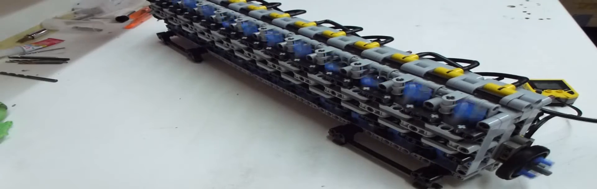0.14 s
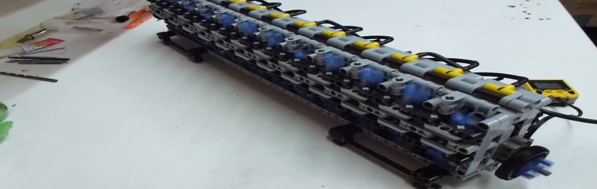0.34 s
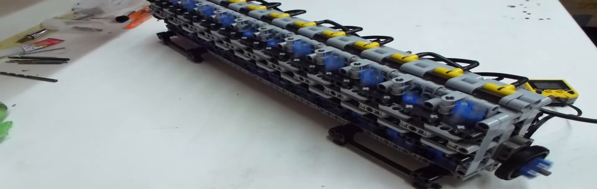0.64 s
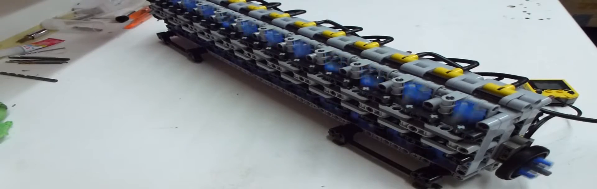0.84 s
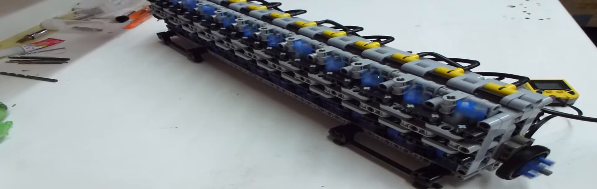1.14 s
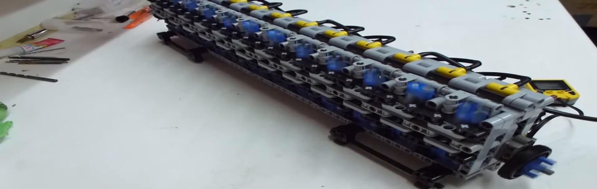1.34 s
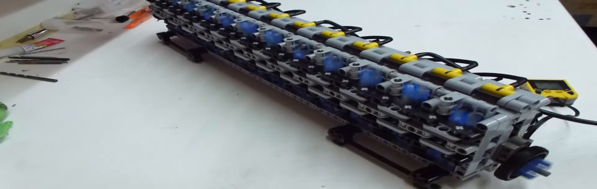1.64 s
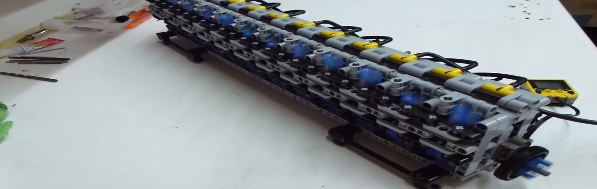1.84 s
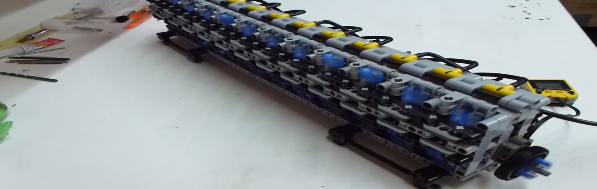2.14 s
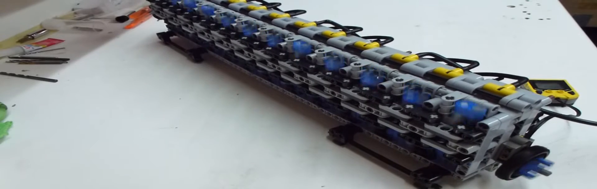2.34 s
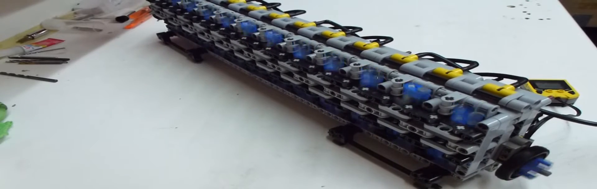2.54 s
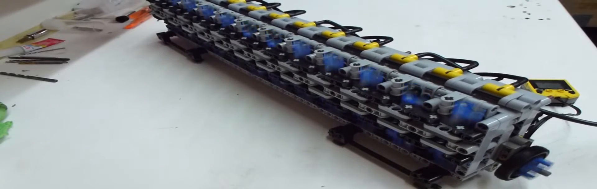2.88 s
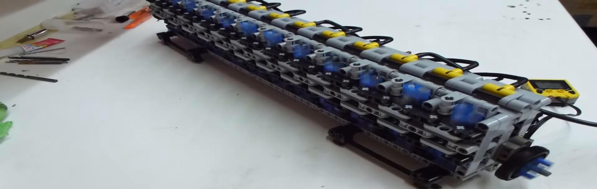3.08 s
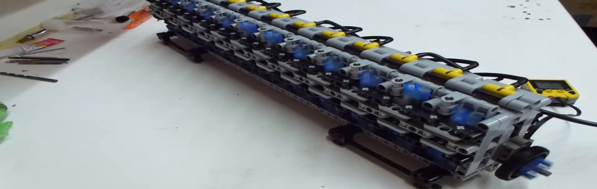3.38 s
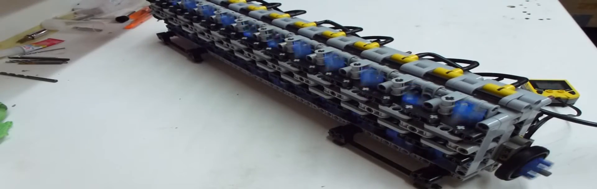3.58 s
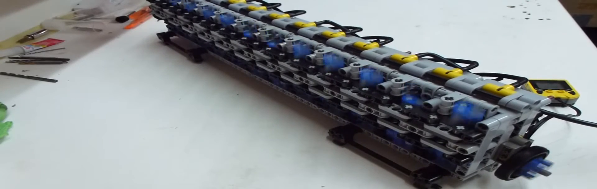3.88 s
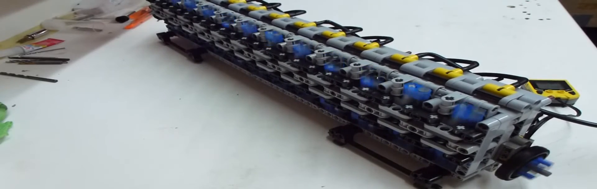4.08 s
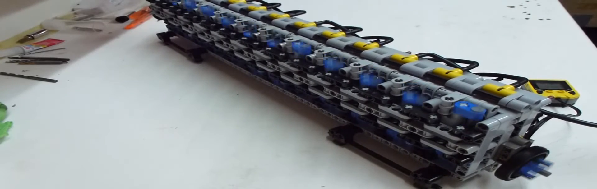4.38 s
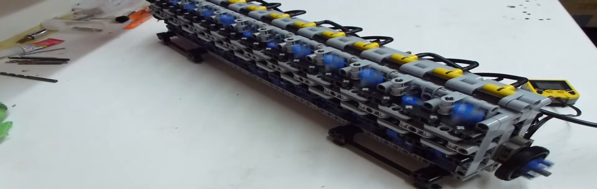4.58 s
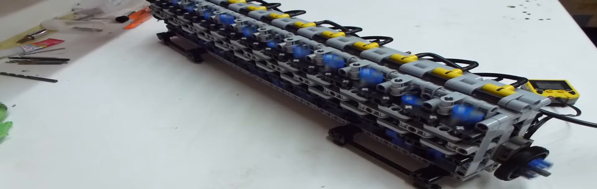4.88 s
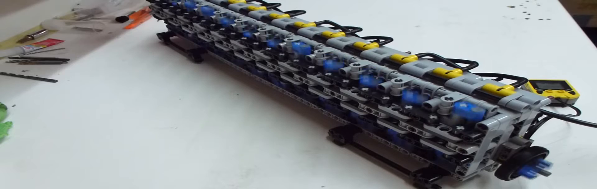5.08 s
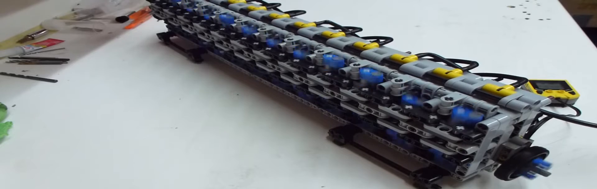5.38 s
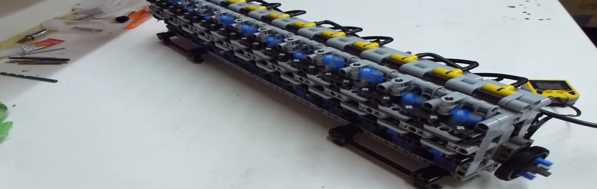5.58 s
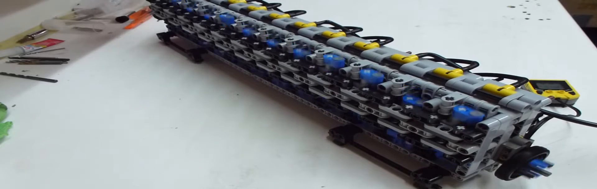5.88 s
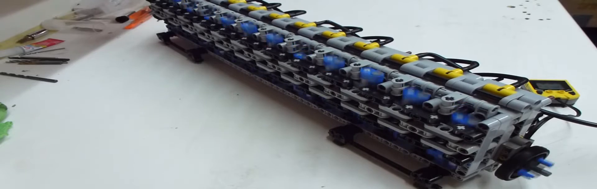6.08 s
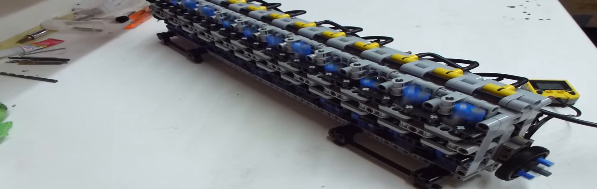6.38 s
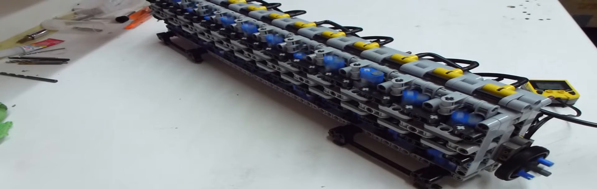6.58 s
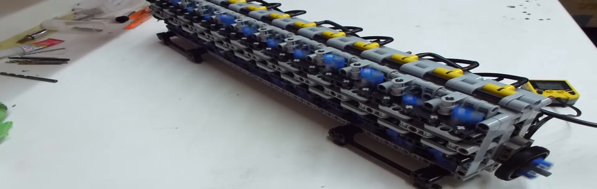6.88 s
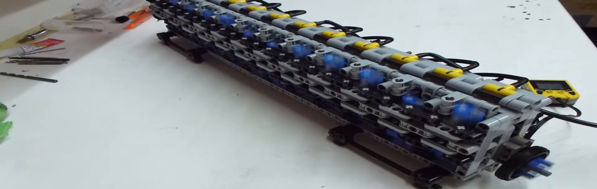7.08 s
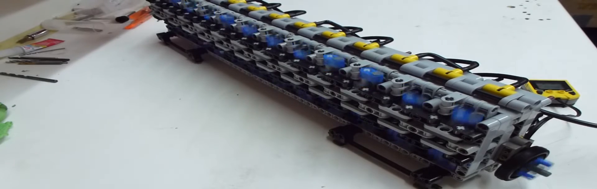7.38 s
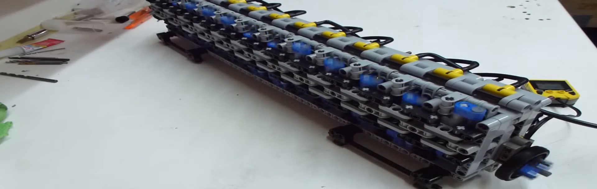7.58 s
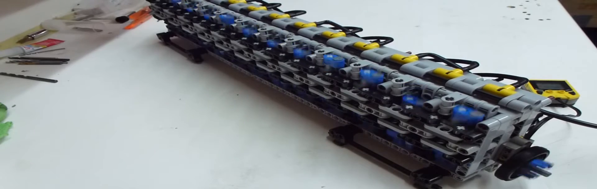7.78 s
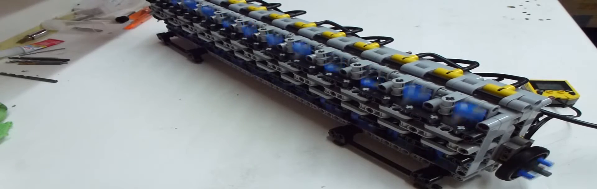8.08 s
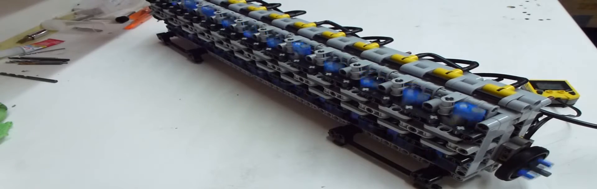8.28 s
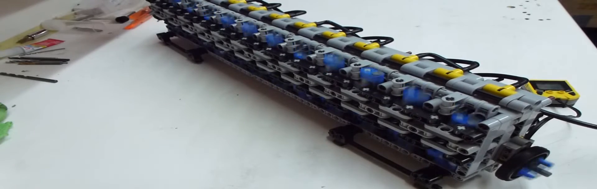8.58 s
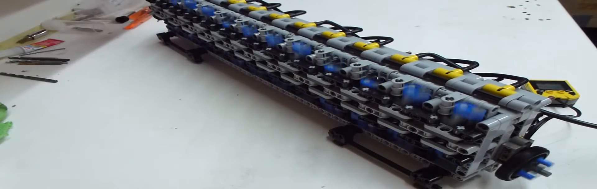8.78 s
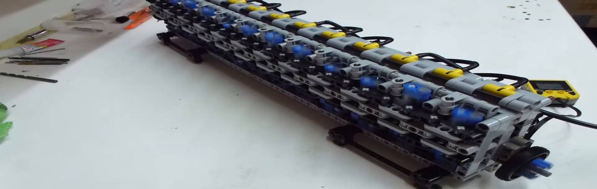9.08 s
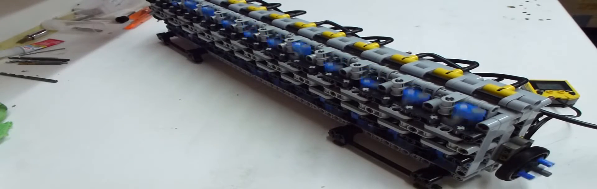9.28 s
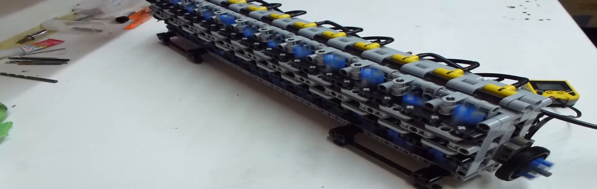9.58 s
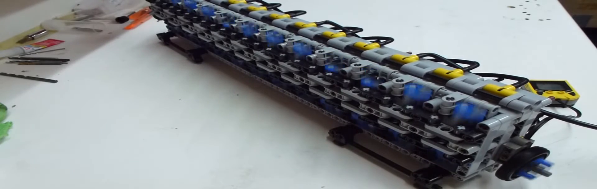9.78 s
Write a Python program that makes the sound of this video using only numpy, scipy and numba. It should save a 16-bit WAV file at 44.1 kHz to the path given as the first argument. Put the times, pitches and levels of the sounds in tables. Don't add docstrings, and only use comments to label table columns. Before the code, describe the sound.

Close stereo phone pickup in a quiet room: buzzing plastic pistons, loose pin rattle, low table hum and bright leaking air. Two quick air cuts come early, a long even run follows, then the sound fades and stumbles near six seconds. Hand-pump strokes revive it in swells that sag between, with rougher clatter, heavier thumps and uneven speed until the end.

```python
import sys
import numpy as np
from scipy import signal
from scipy.fft import rfft, irfft, next_fast_len
from scipy.io import wavfile
from scipy.ndimage import uniform_filter1d
from numba import njit

SR = 44100
rng = np.random.default_rng(int(sys.argv[2]) if len(sys.argv) > 2 else 0)


def put_to_file(sound):
    columns = np.atleast_2d(sound).T
    safe = np.clip(columns, -1, 1)
    whole_steps = np.round(safe * 32767)
    wavfile.write(sys.argv[1], SR, whole_steps.astype(np.int16))


def gain_from_db(level_db):
    decades = np.asarray(level_db, float) / 20
    return 10 ** decades


N = 438354

# crank angle in turns, table force running fast (minus = downwards),
# table level running slow in dB, frame force (minus = downwards), pin level in dB, puff level in dB.
STROKES = [
    (-.032, .76, -9, .76, -12, -4),
    (.186, -.12, -14, 1, -5, -3),
    (.3, .51, -14, .65, -1, -5),
    (.425, -.83, -12, .57, -9, 1),
    (.518, -.55, -3, -.4, 0, -1),
    (.648, -.91, -8, -.47, -8, -4),
    (.741, .17, -12, -.31, -9, -5),
    (.791, 1, -8, -.36, -2, -3),
    (.934, .88, -4, .23, -4, -4),
]
# frequency in Hz, level in dB per Hz.
AIR = [(530, -19.5), (900, -13), (1100, -12.5), (1230, -14), (1370, -13.5), (1940, -12.5), (2800, -5),
       (4260, 0.5), (4860, -1.5), (6560, -1), (10600, -6), (12200, -5.5), (14600, -11), (15700, -15)]
TIGHT_S, TIGHT_DB = .00004, .6
CHATTER = .12


def unit(x):
    return x / np.sqrt(np.mean(x ** 2))


@njit
def svf(x, hz, width):
    y, b, l = np.empty(len(x)), 0., 0.
    g, k = np.tan(np.pi * hz / SR), width / hz
    for i in range(len(x)):
        v = (b + g * (x[i] + 1e-18 - l)) / (1 + g * (g + k))
        b, l, y[i] = 2 * v - b, l + 2 * g * v, k * v
    return y


def ring(x, modes):
    out = 0
    for k, (hz, width, db) in enumerate(modes):
        out = out + (-1) ** k * gain_from_db(db) * svf(x, 1. * hz, 1. * width) / np.sqrt(width)
    return out


def fade(x, s):
    return signal.lfilter([1], [1, -np.exp(-1 / (s * SR))], x)


def clicks(s, size):
    where = np.clip(np.ravel(s) * SR, 0, N - 1).astype(int)
    return np.bincount(where, np.ravel(size), N)


def colour(x, spectrum):
    hz, db = np.transpose(spectrum)
    size = next_fast_len(N)
    f = np.maximum(np.arange(size // 2 + 1) * SR / size, 1)
    return irfft(rfft(x, size) * gain_from_db(np.interp(np.log(f), np.log(hz), db)), size)[..., :N]


def even(x, s):
    width = int(s * SR)
    power = uniform_filter1d(uniform_filter1d(x ** 2, width), width)
    return x / np.sqrt(np.maximum(power, 1e-12))


def walk(rate):
    k = int(SR / rate)
    held = np.repeat(rng.standard_normal(N // k + 1), k)
    return unit(uniform_filter1d(uniform_filter1d(held, k), k)[:N])


def room():
    # frequency in Hz, level in dB per Hz.
    room_tone = [(15, -36), (25, 8), (152, 19), (707, -20), (1350, -15), (1630, -48), (4300, -19),
                 (5640, -22), (7580, -35), (15700, -35)]
    return unit(colour(rng.standard_normal((2, N)), room_tone)) * gain_from_db(-60)


def bump():
    # frequency in Hz, width in Hz, level in dB.
    bump_modes = [(390, 35, 2), (507, 25, 7), (635, 25, 0), (780, 45, 2)]
    knock = fade(clicks([1.565], [1.]), .015) * rng.standard_normal(N)
    return unit(ring(knock, bump_modes)) * gain_from_db(-61)


def crank():
    # time in seconds, crank turns done, while a hand pump drives the engine.
    pumped = [(5.318, 71.5), (5.657, 74.5), (6.17, 77.5), (6.271, 78.5), (6.842, 83.5), (6.98, 84.5),
              (7.09, 85.5), (7.278, 87.5), (7.451, 89.5), (7.555, 90.5), (8.121, 95.5), (8.304, 97.5),
              (8.645, 100.5), (8.989, 104.5), (9.472, 108.5), (9.663, 110.5), (9.95, 113.7)]
    n = np.arange(-16, 72.)
    drag = .375e-6 * np.maximum(n, 0) ** 3
    throttle = .001648 * np.maximum(n - 53.45, 0) ** 2
    stumble = np.interp(n, (-5, -2), (.016, 0))
    s = .7835 + .054 * n + drag + throttle - stumble
    return np.concatenate([[s, n], np.transpose(pumped)], axis=1)


def strokes():
    s, turns = crank()
    angle = np.arange(turns[0] - 1, turns[-1])[:, None] + np.array(STROKES)[:, 0]
    at = np.interp(angle, turns, s)
    period = np.interp(angle + .5, turns, s) - np.interp(angle - .5, turns, s)
    slow = np.clip((period - .06) / .05, 0, 1)
    return at, slow * (angle < turns[-1])


def pressure(t):
    # time in seconds, level of the air from the tank in dB.
    tank = [(0, -24), (.85, -25), (2.34, -26), (3.78, -25.5), (4.04, -27.5), (5.0, -28), (5.4, -27.5),
            (5.78, -35), (5.95, -43.5)]
    # peak in seconds, peak level in dB, rise in dB per second, hold in seconds.
    surges = [
        (6.234, -24, 40, 0.1),
        (7.044, -24, 28, 0.26),
        (8.1, -23, 35, 0.061),
        (8.66, -23, 34, 0.099),
        (9.57, -23, 49, .24),
    ]
    # closes in seconds, opens in seconds, fall in dB per second, opening time in seconds.
    cuts = [
        (.005, 0.233, 129, 0.014),
        (0.494, 0.621, 123, 0.011),
    ]
    levels = []
    for peak_s, peak_db, rise, hold in surges:
        sag = 10 * np.maximum(t - peak_s - hold, 0)
        levels.append(peak_db - rise * np.maximum(peak_s - t, 0) - sag)
    levels[0] += np.interp(t, (5.87, 5.965, 6.0), (-8, -8, 0))
    levels.append(np.interp(t, *np.transpose(tank)))
    db = uniform_filter1d(np.max(levels, axis=0), int(0.027 * SR))
    for shut, opens, fall, opening in cuts:
        since = np.maximum(t - opens, 0)
        left = gain_from_db(-fall * np.clip(t - shut, 0, opens - shut))
        opened = (1 - np.exp(-since / opening)) ** 2
        overshoot = gain_from_db(2.5 * np.exp(-since / 0.053))
        db = db + 20 * np.log10(left + opened * (overshoot - left))
    return db


def load(t, slack):
    s, turns = crank()
    turn = np.interp(t, s, turns)
    hz = 1 / (np.interp(turn + .5, turns, s) - np.interp(turn - .5, turns, s) + 1e-9)
    crawl_hz, labour_hz = 7.9, 11.9
    labour = np.clip(labour_hz - hz, 0, labour_hz - crawl_hz)
    boom = 9.5 * np.exp(-((np.maximum(hz, crawl_hz) - 8.9) / 2.03) ** 2)
    table_db = -22.5 - 3 * slack + boom
    frame_db = -15.5 - slack - labour
    top_db = -3.5 - 4 * slack + 0.42 * labour
    return table_db, frame_db, top_db


def blows(at, slow, db, tight_s, loose_s, tight_db, loose_db, way):
    chance = rng.standard_normal(at.shape + (2,))
    s = at + (tight_s + loose_s * slow) * chance[..., 0]
    running = (at < at.max()) * (at > 0)
    return clicks(s, running * way * gain_from_db(db + (tight_db + loose_db * slow) * chance[..., 1]))


def air(at, slow, slack, top_db):
    edges_hz = [500, 1500, 2600, 4800, 9000, 17000]
    bands = [(.2, 0.17, 0.66, 0.1), (.25, .2, 0.24, 0.3), (.3, 0.15, 0.12, 0.3), (.4, 0.12, 0.16, 0.34),
             (.6, 0.35, 0.17, 0.7)]
    f = np.arange(N // 2 + 1) * SR / N
    rattle_s = rng.uniform(0, N / SR, 6000)
    rattle = gain_from_db(0.77 * np.minimum(rng.exponential(size=6000), 4))
    rattle = unit(fade(clicks(rattle_s, rattle), 0.00062))
    swell = walk(30)
    puff_db = np.array(STROKES)[:, 5]
    shared = unit(fade(blows(at, slow, puff_db, 0.00051, .004, 1.4, 1.6, 1.), 0.0075))
    fast_hush_db = -9 * (1 - slack)
    out = 0
    for lo_hz, hi_hz, (puff_share, grit, hush, top) in zip(edges_hz, edges_hz[1:], bands):
        own = unit(fade(blows(at, slow, puff_db, 0.00094, 0.0022, 4.0, 8.7, 1.), 0.0027))
        gate = 1 + puff_share * (shared + 0.35 * own) + grit * rattle
        gate = gate * gain_from_db(.5 * swell + 0.21 * walk(42))
        noise = irfft(rfft(rng.standard_normal((2, N))) * ((f >= lo_hz) & (f < hi_hz)), N)
        out = out + noise * even(gate, 0.065) * gain_from_db(top * top_db + hush * fast_hush_db)
    return out


def hiss(at, slow, slack, top_db, air_db):
    dulling = 0.74 * np.minimum(air_db + 35, 0)
    return unit(colour(air(at, slow, slack, top_db + 5.5 + dulling), AIR)) * gain_from_db(air_db + 1.5)


def vent(events, s):
    at, db = np.transpose(events)
    return uniform_filter1d(fade(clicks(at, gain_from_db(db)), s), 30) * rng.standard_normal((2, N))


def bursts():
    # time in seconds, peak in dB.
    lone = [
        (5.6412, -25),
        (5.7719, -19),
        (5.843, -23),
        (5.856, -25),
        (5.911, -22),
        (5.944, -20),
        (5.965, -22),
        (5.983, -24),
        (5.9954, -21),
    ]
    # time in seconds, peak in dB.
    cracks = [(0.6994, -9), (0.7544, -12), (0.8094, -14), (0.9138, -9), (1.9445, 2), (2.2732, -10),
              (3.557, 3), (3.9095, -12), (5.0085, -17), (5.233, -12), (5.3472, -1), (6.1749, -9),
              (6.3036, -10), (6.3844, -14), (6.4143, -8), (6.5261, -17), (6.8204, 4), (6.9546, -17),
              (6.9955, -7), (7.1194, 1), (7.5847, -15), (7.8695, -25), (9.3606, -13), (9.4484, -13),
              (9.774, -6), (9.8789, -8)]
    gain = 1 / np.sqrt(np.sum(colour(clicks([1.], [1.]), AIR) ** 2))
    both = vent(lone, 0.0062) * gain_from_db(-8) + vent(cracks, 0.0018) * gain_from_db(-19.5)
    return colour(both, AIR) * gain


def sway():
    return unit(svf(svf(rng.standard_normal(N), 46.2, 44.), 46.2, 44.))


def pin_rattle(at, slow, slack):
    # frequency in Hz, width in Hz, level in dB.
    pin_modes = [(825, 37, -9.5), (995, 72, -3.5), (1117, 83, 0.5), (1258, 50, -4.5), (1320, 57, -0.5),
                 (1455, 66, -0.5)]
    # frequency in Hz, width in Hz, level in dB.
    high_modes = [(1773, 45, -7), (2037, 100, -2.5), (2730, 350, 6)]
    ticks = blows(at, slow, np.array(STROKES)[:, 4], TIGHT_S, 0.002006, 2 * TIGHT_DB, 10.0, 1.)
    noise = (CHATTER + 2.0 * slack) * rng.standard_normal(N)
    return even(ring(unit(ticks) + noise, list(pin_modes) + list(high_modes)), .2)


def frame_knock(at, slow, slack):
    # frequency in Hz, width in Hz, level in dB.
    frame_modes = [(228.4, 21, -6.5), (272.7, 28.5, 0), (303.4, 56, 1), (349.5, 13.3, -6.5), (379, 42, -4),
                   (432, 40, -3.5), (468.4, 31, -2), (493.7, 42.4, 1), (545, 29, -3.5), (663, 30, -8.5),
                   (760, 60, -8.5)]
    force = np.array(STROKES)[:, 3]
    db = 20 * np.log10(np.abs(force)) * (1 + 1.2 * slow)
    knocks = blows(at, slow, db, TIGHT_S, .0006, TIGHT_DB, 2.5, np.sign(force))
    noise = (CHATTER + 0.78 * slack ** 2) * rng.standard_normal(N)
    return even(ring(unit(knocks) + noise, frame_modes), .2)


def table_thump(at, slow, slack):
    # frequency in Hz, width in Hz, level in dB.
    fast_modes = [(59, 36, -36.5), (79, 9, -12), (88, 30, -7), (110, 14, 0), (136, 36, -4), (163, 25, -9)]
    # frequency in Hz, width in Hz, level in dB.
    slow_modes = [(100, 50, -4.5), (124, 46, -3.5), (121, 11, 1), (146.5, 9.7, -3), (168.4, 8.6, -6.5)]
    _, force, slow_db, _, _, _ = np.transpose(STROKES)
    fast_db = 20 * np.log10(np.abs(force))
    hum = blows(at - .002, slow, fast_db, TIGHT_S, 0.0064, TIGHT_DB, 3.0, np.sign(force))
    hum = ring(unit(hum) + CHATTER * rng.standard_normal(N), fast_modes)
    thump = blows(at, slow, slow_db, TIGHT_S, .001, TIGHT_DB, 2.0, 1.)
    thump = ring(unit(thump) + .4 * rng.standard_normal(N), slow_modes)
    return even((1 - slack) * unit(hum) + slack * unit(thump), .2)


def engine(at, slow, slack, table_db, frame_db):
    return (table_thump(at, slow, slack) * gain_from_db(table_db)
            + frame_knock(at, slow, slack) * gain_from_db(frame_db)
            + pin_rattle(at, slow, slack) * gain_from_db(-17 - 2.5 * slack)
            + sway() * gain_from_db(-41 + .5 * (table_db + 18)))


def spread(pair):
    # frequency in Hz, side minus mid in dB.
    likeness = [(60, -6), (110, -27), (200, -16), (380, -21.5), (700, -15), (1290, -14.5), (2380, -13.5),
                (4400, -7.5), (8120, -5), (15000, -0.5)]
    side = colour(pair[1], likeness)
    return np.array([pair[0] + side, pair[0] - side])


def scene():
    t = np.arange(N) / SR
    at, slow = strokes()
    slack = np.interp(t, at.ravel(), slow.ravel())
    air_db = pressure(t)
    table_db, frame_db, top_db = load(t, slack)
    solid = engine(at, slow, slack, table_db, frame_db) * gain_from_db(air_db) + bump()
    solid = np.array([solid, np.roll(solid, 190)])
    return spread(room() + bursts() + hiss(at, slow, slack, top_db, air_db) + solid)


def low_pass(x):
    return signal.sosfilt(signal.butter(12, 15760, fs=SR, output="sos"), x)


def record(dry):
    cut = signal.ellip(10, .2, 80, 15740, fs=SR, output="sos")
    return low_pass(signal.sosfilt(cut, dry))


dry = scene()
out = record(dry)
put_to_file(out)
```